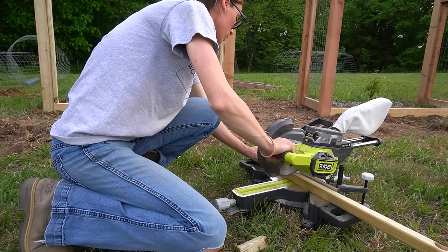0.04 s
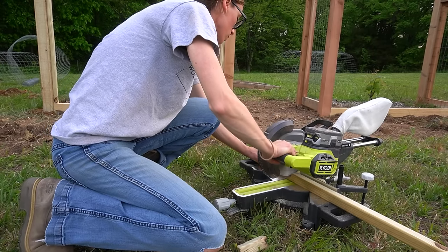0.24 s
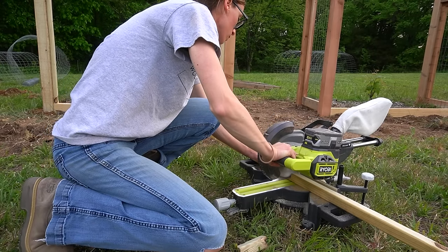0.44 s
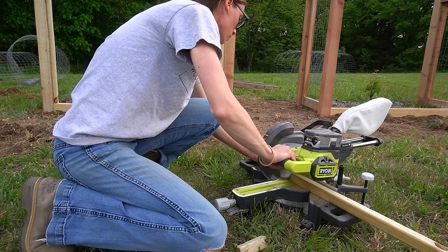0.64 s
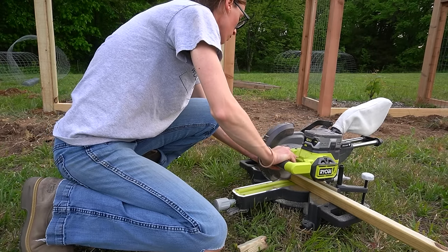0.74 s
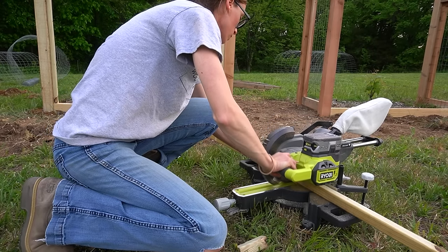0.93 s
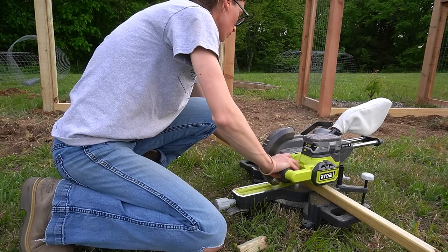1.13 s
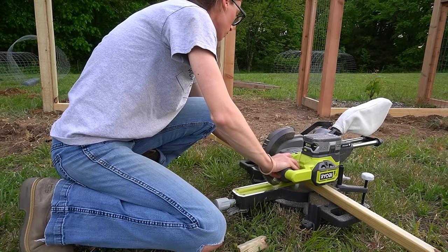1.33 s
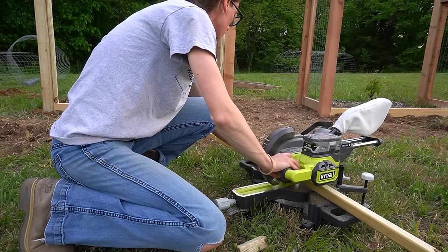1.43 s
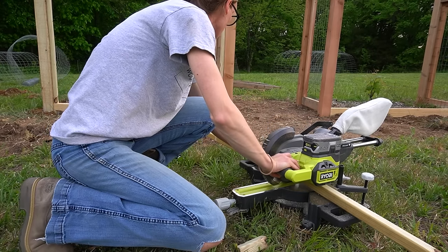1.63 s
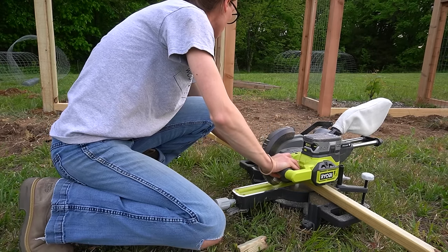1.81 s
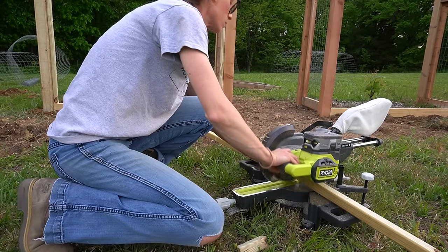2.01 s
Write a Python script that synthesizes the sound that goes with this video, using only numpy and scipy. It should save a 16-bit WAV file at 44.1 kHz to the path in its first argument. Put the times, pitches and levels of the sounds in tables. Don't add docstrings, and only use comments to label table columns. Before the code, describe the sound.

A power mitre saw screeches through a thin board outdoors, then whines down to a stop.

```python
import sys
import numpy as np
from scipy import signal
from scipy.fft import rfft, irfft, next_fast_len
from scipy.io import wavfile
from scipy.ndimage import uniform_filter1d

SR = 44100
rng = np.random.default_rng(int(sys.argv[2]) if len(sys.argv) > 2 else 0)


def persist_wave(psi):
    counts = np.round(np.clip(psi, -1, 1) * 32767).astype(np.int16)
    wavfile.write(sys.argv[1], SR, np.atleast_2d(counts).T)


def invert_db(level):
    return 10 ** (np.asarray(level, dtype=float) / 20)


N = 90978
PINION_TEETH, WHEEL_TEETH, BLADE_TEETH = 9, 40, 24
SWITCH_S = 1.127


def level(x, db):
    return x * invert_db(db) / np.sqrt(np.mean(x ** 2))


def curve(rows, axis):
    rows = np.array(rows, float)
    return np.interp(np.arange(N) / SR, rows[:, 0], rows[:, axis])


def body(x, tilt, peaks=(), ring_db=0.):
    size = next_fast_len(N + SR // 4)
    f = np.arange(size // 2 + 1) * SR / size + 1
    tilt_hz, tilt_db = np.transpose(tilt)
    gain = invert_db(np.interp(np.log(f), np.log(tilt_hz), tilt_db)) + 0j
    for hz, width_hz, db in peaks:
        s = 1j * (f / hz - hz / f) * hz / width_hz
        peak = invert_db(np.clip(ring_db + db / 4, -20, 12))
        gain *= (peak + s) / (1 + s)
    return irfft(rfft(x, size) * gain, size)[..., :N]


def walk(rate_hz):
    k = int(SR / rate_hz)
    steps = np.repeat(rng.standard_normal(N // k + 1), k)
    return 0.99 * uniform_filter1d(uniform_filter1d(steps, k), k)[:N]


# time_s, mesh_hz, gear_db, second_harmonic_extra_db, shaft_wobble_0_1, fundamental_db
GEAR = [(0, 1571, -52, -12, 0.1, -91), (.19, 1518, -65, 7, 0, -58.5), (.33, 1447, -58.5, 8, 0, -65),
        (.52, 1378, -61, -1.5, 0, -53.5), (.86, 1381, -47, 2.5, .3, -49.5), (.91, 1328, -47, 4, 0.1, -56),
        (.965, 1267, -39, 2, 0.2, -65), (.994, 1269, -40, -16, 0.2, -63), (1.082, 1471, -46, 3.5, 0.1, -84),
        (1.135, 1527, -50.5, -2, 0.54, -54), (1.15, 1498, -46, 0.5, 0.3, -60),
        (1.175, 1440, -49, 7, 0.32, -64), (1.4, 1062, -54, -1.5, .98, -80.5),
        (1.43, 1016, -57, 5.5, 0.3, -78), (1.63, 719.6, -64.5, 9, 0.39, -90),
        (1.8, 524.7, -76, 10, 0.32, -90.5), (1.92, 400, -79.5, -6.5, 0.4, -91),
        (2.07, 366.6, -104, -16.5, 0.38, -98)]
# harmonic_number, level_db
MESH = [(2, -3), (3, -3), (4, 2), (5, -1), (6, 2), (7, -4), (8, -1), (9, -2), (10, -5), (11, -4), (12, -5),
        (13, -7), (14, -7)]
# pitch_hz, width_hz, level_db
HOUSING = [(1620, 86.8, -5), (1947, 104, -13), (2960, 170, 0.5), (3306, 130, -12), (4090, 580, -7.5),
           (5460, 140, -3), (5950, 320, -2), (7030, 180, -7), (7920, 350, -2), (9285, 295, 6)]
# pitch_hz, level_db
HOUSING_TILT = [(240, -64), (400, -36.5), (1040, -25.5), (1960, -4), (2320, -1), (2880, -5.5), (5430, -9.5),
                (9180, -19), (16000, -39)]
# pitch_hz, width_hz, level_db
BASE = [(400, 50, 18), (526.6, 67, 34), (812.7, 59, 35)]


def gears(turn):
    mesh_hz = curve(GEAR, axis=1)
    shaft, wheel = turn / PINION_TEETH, turn / WHEEL_TEETH
    phase = turn + .22 * np.sin(shaft) + .05 * walk(300)
    throb = (1 + curve(GEAR, axis=4) * np.cos(shaft)) ** 0.73 * (1 + .2 * np.cos(wheel))

    whine = 0
    for k, db in MESH:
        level_db = db + 3.0 * walk(24) + (k == 2) * curve(GEAR, axis=3)
        audible = k * mesh_hz < .4 * SR
        whine = whine + invert_db(level_db) * np.cos(k * phase + k * k) * audible

    since_tooth = phase / (2 * np.pi) % 1
    rattle = rng.standard_normal(N) * np.exp(-since_tooth / .6)
    rattle = rattle * invert_db(6 * np.log2(mesh_hz / 1400))

    def housing(x):
        return level(body(x, HOUSING_TILT, HOUSING, ring_db=9), 0)

    hum = np.cos(turn + .25 * np.sin(shaft) + .7 * walk(60)) + .3 * np.cos(2 * turn + walk(60))
    hum = hum * invert_db(curve(GEAR, axis=5) + 4.8 * walk(30.02))
    base_tilt = [(300, -4.5), (900, -3.5), (1300, 1), (1700, 1), (2200, -24.5)]
    hum = body(hum, base_tilt, BASE + BASE)
    return (housing(whine * throb) + invert_db(-3) * housing(rattle * throb)) * invert_db(curve(GEAR, axis=2)) + hum


# pitch_hz, level_db
WHIRR = [(250, -21.5), (450, -16), (1000, -12.5), (2000, 2), (4000, -5), (5500, 0), (9800, -12),
         (11000, -36), (13500, -29), (15000, -51.5)]
# pitch_hz, width_hz, level_db
WHIRR_PEAKS = [(2100, 100, -4), (2950, 110, -3), (5390, 130, 19), (5800, 360, 2), (6900, 240, -1),
               (7420, 260, 0.5), (9200, 120, -1)]


def whirr(turn):
    start_db, fade_db_s, stop_s, stop_fade_db_s = -57, 28.5, 1.946, 90
    t = np.arange(N) / SR
    throb = 1 + curve(GEAR, axis=4) * np.cos(turn / PINION_TEETH)
    rub = rng.standard_normal(N) * throb * invert_db(2.0 * walk(25))
    db = start_db - fade_db_s * np.maximum(t - SWITCH_S, 0) - stop_fade_db_s * np.maximum(t - stop_s, 0)
    return level(body(rub, WHIRR, WHIRR_PEAKS, ring_db=6.7), 0) * invert_db(db)


# time_s, bite_db, sing_db
CUT = [
    (0, -42.5, -35.5),
    (.15, -44, -39.5),
    (.4, -40, -38.5),
    (.85, -40, -37.5),
    (.95, -40.5, -38),
    (.975, -43.5, -45),
    (.995, -50, -60),
    (1.05, -89, -69.5),
    (1.2, -125, -150),
]
# multiple_of_mesh, level_under_bite_db
LOADED = [(.93, -17.5), (1.2, -22), (1.6, -12), (2.4, -14.5), (3, -31), (4.3, -26)]
# pitch_hz, level_db
BITE = [(300, -52), (600, -27), (1150, -11.5), (1400, -8), (2500, 2), (3900, 0.5), (7000, -1.5),
        (10000, -21.5)]
# pitch_hz, level_db
SING = [(2000, -39.5), (4000, -2), (6000, 1.5), (9000, 6), (11500, -0.5), (14000, -1), (16000, -10.5)]
# pitch_hz, width_hz, level_db
BLADE = [(3926, 42, 11), (4710, 350, -7.5), (5890, 70, -1), (7440, 42, 8.5), (9680, 41, 4), (10100, 35, 8),
         (10840, 58, 8), (11570, 330, 9.5), (12260, 240, 1), (12550, 84, -7.5), (13420, 79, -8.5),
         (16050, 210, -6)]


def cut(turn):
    blade_ring_db, scatter_db, tear_share = 6.5, 1.8, 1.2
    t = np.arange(N) / SR
    tooth = turn * BLADE_TEETH / WHEEL_TEETH / (2 * np.pi)
    tooth_db = scatter_db * np.clip(rng.standard_normal(N // 8), -2, 2)
    force = invert_db(tooth_db)[tooth.astype(int)]

    def tear():
        chips = rng.standard_normal(N) * invert_db(1.83 * walk(30.02))
        return force * np.exp(-(tooth % 1) / tear_share) * chips

    lines = sum(invert_db(db + 4.1 * walk(9.86)) * np.cos(k * turn + .5 * walk(30.7)) for k, db in LOADED)
    crunch = level(body(tear(), BITE, BLADE, blade_ring_db), 0)
    bite = (crunch + lines) * invert_db(curve(CUT, axis=1))
    shallow = 1 - np.clip(t / .72, .56, 1)
    bite = bite - shallow * body(bite, [(2000, -2.5), (2500, -26.5)])

    sing_gain = invert_db(curve(CUT, axis=2))
    sing = level(body(tear(), SING, BLADE, blade_ring_db), 0) * sing_gain
    board_hz, board_width_hz, board_db, board_rise_db_s = 830, 95, -68.5, 8
    b, a = signal.iirpeak(board_hz, board_hz / board_width_hz, fs=SR)
    board = signal.lfilter(b, a, signal.lfilter(b, a, tear() * sing_gain))
    return bite + sing + level(board, board_db) * invert_db(board_rise_db_s * t)


# start_s,
# length_s, pitch_hz, level_db
SQUEALS = [(0.13, 0.22, 6600, -58), (.05, 0.34, 4690, -59.5), (.08, 0.15, 5910, -48.5),
           (.14, 0.23, 3885, -54), (.15, 0.15, 5450, -52.5), (.3, 0.086, 4730, -46),
           (.38, 0.072, 2825, -44.5), (.36, .1, 3305, -55), (.38, 0.26, 5870, -51.5),
           (.46, 0.11, 4606, -48), (.5, 0.17, 4140, -48), (.52, 0.13, 3900, -48.5), (.54, 0.32, 4833, -52),
           (.55, 0.36, 5112, -52.5), (.62, 0.17, 5948, -45.5), (.68, 0.1, 5535, -50),
           (.6, 0.12, 2206, -50.5), (.82, 0.074, 3790, -45.5), (.918, 0.028, 2610, -37.5),
           (.95, 0.03, 2530, -35.5), (.93, 0.062, 3800, -44.5), (0, .12, 10450, -51.5),
           (.08, 0.11, 10195, -48), (.05, .25, 11500, -44.5), (.1, 0.36, 11620, -50.5),
           (.36, .2, 12490, -52.5), (.38, 0.12, 11410, -47), (.35, 0.18, 9715, -57), (.5, .25, 10740, -49),
           (.65, 0.29, 12700, -57), (.74, .12, 7290, -48.5), (.76, .1, 8310, -44.5),
           (.84, 0.081, 12150, -56), (0.244, 0.49, 1275, -60.5), (0.63, 0.37, 1255, -64),
           (0.28, 0.52, 862, -66.5), (0.63, 0.43, 800, -62.5), (0.34, 0.51, 720, -71.5),
           (0.57, 0.22, 1657, -57.5), (.88, 0.11, 600, -74), (1.14, 0.034, 3000, -42.5)]


def squeals():
    t, out = np.arange(N) / SR, 0
    for start_s, length_s, hz, db in SQUEALS:
        swell = np.sin(np.pi * np.clip((t - start_s) / length_s, 0, 1))
        env = swell * invert_db(db + 3.5 * walk(41.1))
        waver = 1.6 * np.sqrt(hz / 10000) * walk(49.8)
        out = out + np.sqrt(2) * env * np.sin(2 * np.pi * hz * t + waver)
    return out


# pitch_hz, level_db
ECHO = [(200, -39), (500, -33), (1000, -3), (2000, -4), (4000, -3), (8000, 1.5), (16000, 15.5)]


def echoes(saw):
    t60_s, echo_db, size = 0.093, -4.5, SR // 5
    t = np.arange(size) / SR
    tail = rng.standard_normal((2, size)) * invert_db(-60 * t / t60_s)
    tail = level(tail, 0) / np.sqrt(size)
    return body(signal.fftconvolve(saw[None], tail)[:, :N], ECHO) * invert_db(echo_db)


# pitch_hz, level_db
ENGINES = [(28.5, -112), (57, -89), (86, -88), (143, -86.5), (172, -133)]
# pitch_hz, level_db, beat_rate_hz, loudest_s, depth_0_1
BEATS = [(113, -70.5, 4.5, 1.572, .9), (226, -77, 9, 1.715, .8)]
# pitch_hz, level_db
AIR = [(30, -50), (60, -17), (130, -15), (250, -15), (500, -34.5), (2020, -25.5), (3800, -60), (5400, -33),
       (12000, -86)]


def distance():
    second_joins_s, air_db = 1.3, -81
    t = np.arange(N) / SR

    def tone(hz, db):
        return np.sqrt(2) * invert_db(db) * np.exp(2j * np.pi * hz * t + .1j * walk(5))

    drone = sum(tone(hz, db).real for hz, db in ENGINES)
    joined = np.clip(t / second_joins_s, .3, 1) ** 2
    for hz, db, rate_hz, peak_s, depth in BEATS:
        swing = np.exp(1j * np.pi * rate_hz * (t - peak_s))
        pair = swing + depth * joined / swing
        drone = drone + (tone(hz, db) * pair / 2).real
    near = body(rng.standard_normal(N), AIR)
    wide = body(body(rng.standard_normal((2, N)), AIR), ECHO)
    return drone + level(near + .3 * wide, air_db)


def ring(start_s, hz, sag_hz_s, t60_s, db, rough_db):
    t = np.maximum(np.arange(N) / SR - start_s, 0)
    env = invert_db(db - 60 * t / t60_s + rough_db * walk(38.87)) * (1 - np.exp(-t / 0.019))
    return env * np.sin(2 * np.pi * (hz * t - sag_hz_s * t ** 2 / 2) + 0.99 * walk(40.2))


def offcut():
    return ring(start_s=.92, hz=835, sag_hz_s=250, t60_s=.42, db=-47, rough_db=2.0)


def guard():
    return ring(start_s=.975, hz=1915, sag_hz_s=-58.0, t60_s=1.1, db=-45, rough_db=7.0)


def switch():
    t = np.arange(N) / SR - SWITCH_S
    snap = rng.standard_normal(N) * (t > 0) * invert_db(-60 * np.maximum(t, 0) / .012)
    snap = body(snap, [(500, -59), (1500, -8), (3500, -1), (10000, -17.5), (16000, -33.0)])
    return snap * invert_db(-22)


# pitch_hz, width_hz, level_db
DIPS = [(2320, 160, -28), (3700, 150, -44)]


def scene():
    t = np.arange(N) / SR
    turn = 2 * np.pi * np.cumsum(curve(GEAR, axis=1)) / SR
    saw = gears(turn) + whirr(turn) + cut(turn) + squeals()
    saw = saw + offcut() + guard() + switch()
    heard = body(saw + echoes(saw), [(100, 0.013), (16000, 0)], DIPS)
    pan_db = np.interp(t, [.9, 1.1], [-3, -4])
    return heard * invert_db(np.array([pan_db, -pan_db]) / 2) + distance()


def top_cut(x):
    return signal.sosfilt(signal.butter(12, 16790, fs=SR, output="sos"), x)


def record(dry):
    rise_from_s, rise_db_s, top_hz = 0.99, 9.5, 15950
    gain_db = rise_db_s * np.maximum(np.arange(N) / SR - rise_from_s, 0)
    top = signal.ellip(10, .2, 60, top_hz, fs=SR, output="sos")
    return top_cut(signal.sosfilt(top, dry * invert_db(gain_db)))


dry = scene()
out = record(dry)
persist_wave(out)
```